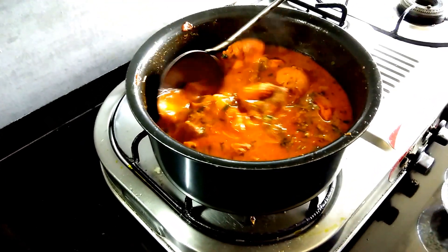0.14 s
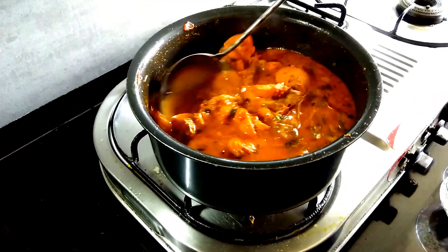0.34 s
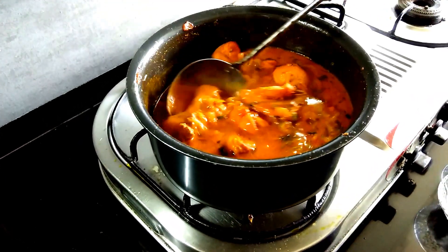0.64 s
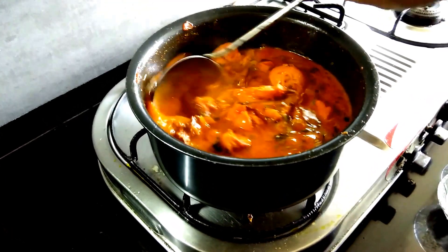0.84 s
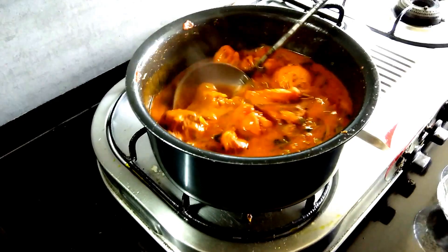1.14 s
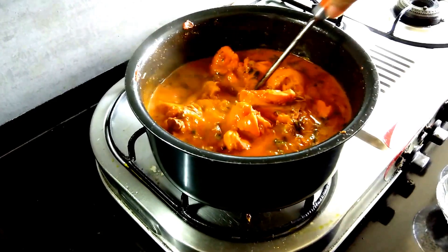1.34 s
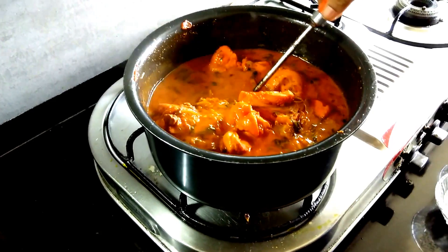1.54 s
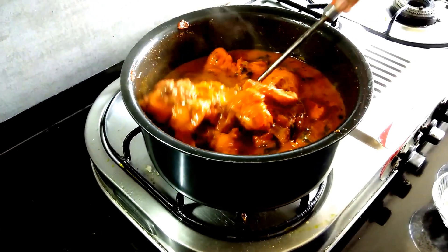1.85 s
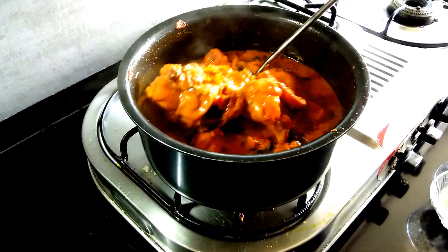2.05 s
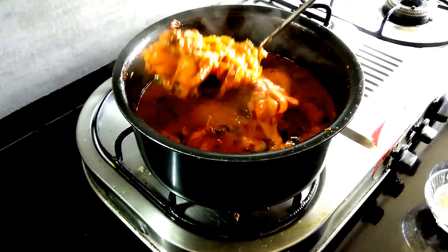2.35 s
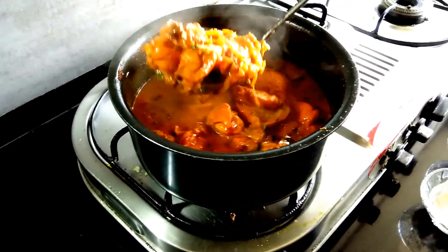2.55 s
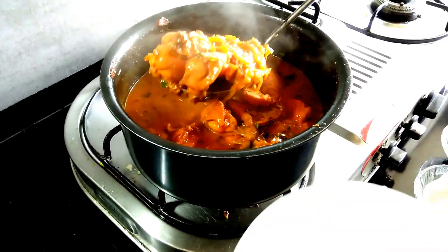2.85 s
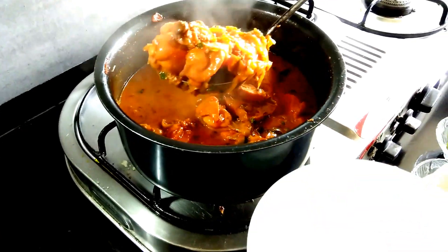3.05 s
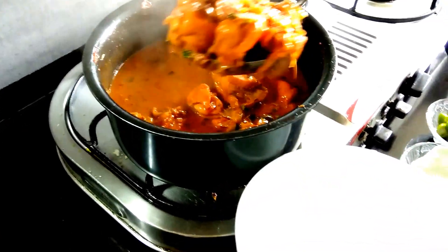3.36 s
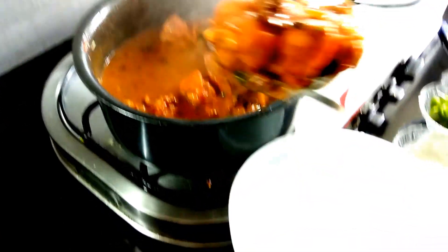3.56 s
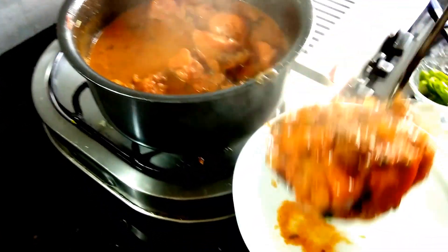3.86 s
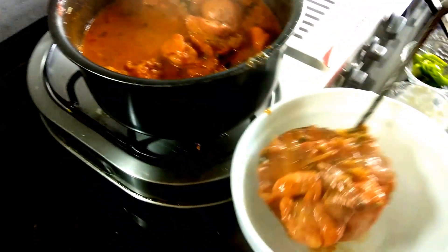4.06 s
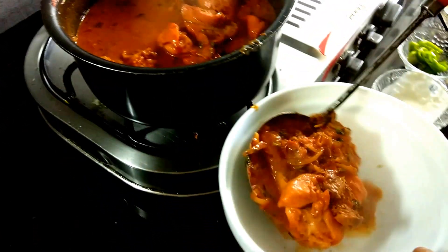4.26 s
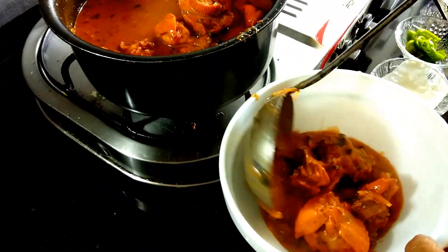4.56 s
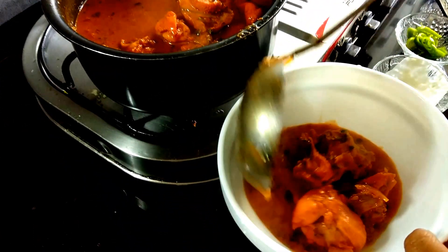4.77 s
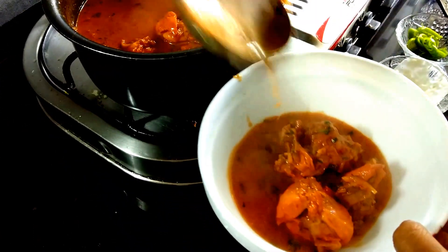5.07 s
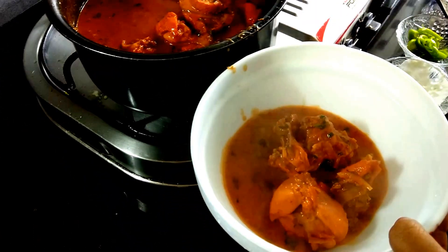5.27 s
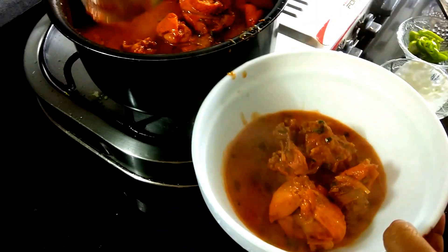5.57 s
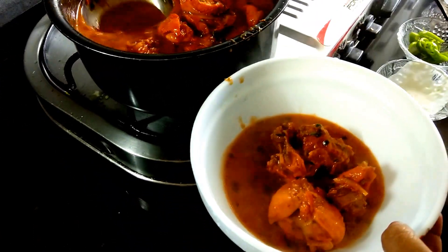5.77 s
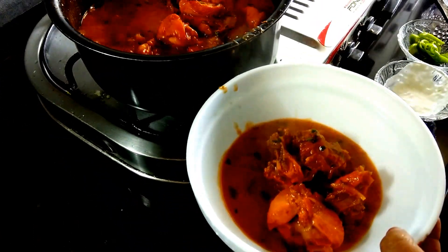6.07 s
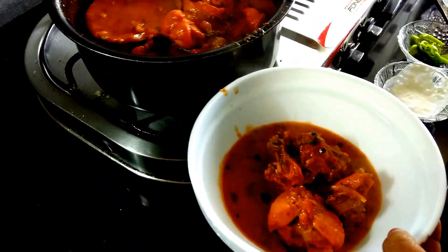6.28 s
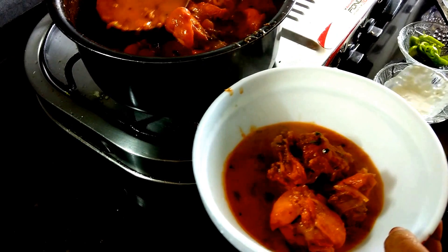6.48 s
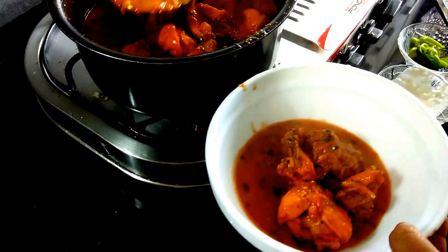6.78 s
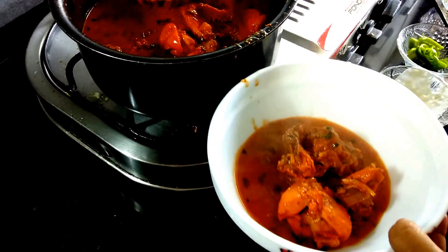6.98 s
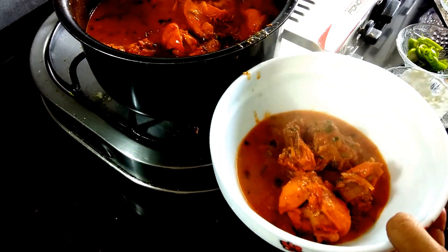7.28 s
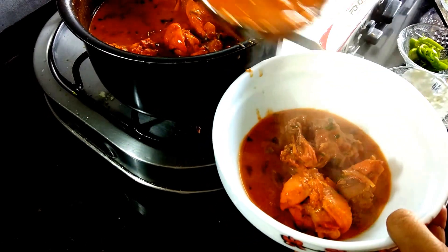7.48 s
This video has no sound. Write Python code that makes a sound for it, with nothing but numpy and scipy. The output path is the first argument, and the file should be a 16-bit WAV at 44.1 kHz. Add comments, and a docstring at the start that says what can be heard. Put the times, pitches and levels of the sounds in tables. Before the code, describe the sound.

Light knocks and taps, a steel pot's clank and one loud pop as curry is ladled into a bowl over steady kitchen air.

```python
"""A small kitchen with hard walls, where curry is ladled from a pot into a bowl near a hand-held camera.
The loudest sound is a pop: an air pocket bursts under a lump of food. The steel pot clanks, the ladle
clinks, gravy drips, and knocks, worktop taps and wet ticks echo in the room. A sliding dish rubs and
rings, and fingers thump the camera. Behind it all are a steady murmur of air, two short hums and a
faint wavering whistle and hiss. The camera's two microphones hear it as left and right."""
import sys
import numpy as np
from scipy import signal
from scipy.fft import rfft, irfft
from scipy.io import wavfile
from scipy.ndimage import uniform_filter1d

SR = 44100
rng = np.random.default_rng(int(sys.argv[2]) if len(sys.argv) > 2 else 0)


def master_out(mix):
    """Clip the mix to full scale and print it as 16-bit PCM to the path in sys.argv[1]."""
    frames = np.transpose(np.atleast_2d(mix))
    ceiling = np.clip(frames, -1, 1)
    pcm = np.round(ceiling * 32767).astype(np.int16)
    wavfile.write(sys.argv[1], SR, pcm)


N = 336659

# How long the room's echo takes to fade by 60 dB: (frequency [Hz], fade time [s])
ROOM_FADE = [(300, 0.23), (2000, .2), (15000, 0.25)]
# How alike the two microphones sound: (frequency [Hz], likeness [0 to 1])
LIKENESS = [(150, .9), (550, 0.81), (1600, .3), (5000, .1)]
# Tone of the air, from bass to treble: (frequency [Hz], level [dB])
AIR_TONE = [(30, -16.5), (62, 1.5), (110, -2), (155, -9.5), (312, -1.5), (521, -6.5), (612, -10),
            (1020, -10.5), (1300, -12.5), (1800, -18.5), (2690, -22), (3300, -30), (5000, -33),
            (8000, -34.5), (12500, -38)]
# Pan is how much louder the left is than the right. For the air: (frequency [Hz], pan [dB])
AIR_PAN = [(60, -4.5), (180, -2), (550, 0.5), (1650, 5.5), (4970, 0.5), (15000, 2.0)]
# Low hums: (time [s], length [s], level [dB])
HUMS = [(.105, .065, -49), (.17, .11, -50)]
# A whistle and a soft hiss above it: (start [s], end [s], level [dB])
WHISTLE, HISS = (2.84, 6.62, -85), (2.86, 4.2, -86)
# Their bands of noise: (frequency [Hz], width [Hz], level [dB])
WHISTLE_BANDS = [(3748, 77, 0)]
HISS_BANDS = [(4600, 600, 0)]
# Fingers on the camera: (time [s], level on the right [dB], pitch [Hz], length [s], pan [dB], snap [dB])
THUMPS = [(.001, -37.5, 85, 0.017, -6, -30), (0.029, -39, 94, 0.03, -6, -30),
          (.066, -35, 70, .012, -4, -30), (3.574, -22.5, 62.5, .028, -24, -3.5),
          (3.819, -47, 55, 0.027, -18, -20), (4.965, -49, 65, .03, -9, -19),
          (5.161, -48, 60, 0.037, -11, -15), (5.6, -44, 55, 0.055, -19, -6),
          (7.058, -32, 57, 0.043, -28, -12), (7.394, -35.5, 60, 0.047, -25, 8.5)]
# Hollow knocks: (time [s], level [dB], treble tilt [dB per octave], pan [dB])
KNOCKS = [(0.015, -34.5, 1, 4.0), (0.516, -42, -0.5, 3.5), (0.999, -41.5, -0.5, 2.0),
          (5.858, -45.5, -5, 5.5), (7.035, -52, 1.5, 7.5), (7.185, -58, 0, 7.0)]
# Tone of a knock: (frequency [Hz], level [dB])
KNOCK_TONE = [(240, -51), (445, -24), (650, -3), (856, -9.5), (1140, 3), (1330, -12), (1790, -7),
              (2520, -29), (5000, -41), (6500, -69)]
# Worktop taps: (time [s], level [dB], treble [dB], low knock [dB], highest treble [dB], rim ring [dB])
TAPS = [(0.257, -35.5, -2, -1.5, -6, 3), (0.649, -41, -4, -12, -36, 1), (0.948, -63, -12, 21, 4, 0),
        (1.172, -36.5, 2, -2, -8, 0), (1.611, -46, -5, 1, -30, 0), (3.671, -40.5, -4, -3, -22, 6),
        (6.221, -39, 2.5, -.5, -6, 1), (7.6015, -41, -2, -20, -36, 16), (7.611, -35, 7, -20, -10, 13)]
# Tone of a tap's crack: (frequency [Hz], level [dB])
TAP_TONE = [(290, -36), (500, -9), (831, -18.5), (1200, -1.5), (1650, -6.5), (2010, -1), (4090, -19),
            (5900, -11.5), (11500, -21), (14900, -22), (16000, -32)]
# Modes are the notes a struck thing rings at. The worktop's: (pitch [Hz], level [dB], fade time [s])
WORKTOP_MODES = [(245, -2, .11), (300, 1.5, .14)]
# Thin wet ticks: (time [s], level [dB], frequency [Hz], pan [dB], length [s])
TICKS = [(0.319, -54, 9000, 5, .001), (2.364, -64, 5500, 4, .004), (2.586, -61, 8000, 7, .005),
         (2.596, -56, 15000, 7, .006), (3.945, -63, 4300, 3, .005), (4.4288, -55, 12000, 9.5, .001),
         (4.549, -60, 5700, 6, .011), (4.737, -59.5, 13500, 4.5, .002), (6.819, -59.5, 9000, 4, .009),
         (6.863, -62.5, 15000, 4, .003)]
# How firmly the sliding dish is pushed: (time [s], level [dB])
SLIDE_PUSH = [(4.86, -75), (4.89, -64), (4.966, -57), (5.014, -62), (5.07, -52), (5.092, -57), (5.12, -50),
              (5.16, -56), (5.215, -58), (5.26, -74)]
# Where the dish rings: (frequency [Hz], rough width [Hz], level [dB])
DISH_BANDS = [(900, 70, -9), (1049, 58, 0), (1200, 80, -9.5), (1570, 230, -18), (2080, 98, -15.5),
              (2390, 300, -15.5)]
# Blows on the steel pot: (time [s], level [dB])
CLANKS = [(3.5295, -21)]
# The pot's notes: (pitch [Hz], level [dB], fade time [s])
POT_MODES = [(388, -12, .1), (753, -13, .12), (838, -9, .15), (980, -5, .13), (1142, 7, .12),
             (1943, -9, .17), (2270, -9, .12), (2729, -13, .14), (3327, -15, .14), (4050, -18, .14),
             (5050, -20, .14), (5346, -19, .12), (9572, -16, .09), (10060, -11, .1), (10450, -12, .07)]
# Tone of its rattling wall: (frequency [Hz], level [dB])
RATTLE_TONE = [(300, -27), (624, -24), (1140, -6), (1610, -28), (1930, -13), (3520, -20), (4520, -33),
               (5500, -24), (8000, -30), (9900, -21.5), (14700, -33.5), (16000, -54)]
# Gravy drips: (time [s], level [dB], pitch [Hz], length [s])
DRIPS = [(2.263, -49.5, 780, .007), (2.876, -52.5, 600, .005), (4.4258, -44, 1000, .001)]
# The ladle touches the bowl: (time [s], level [dB], favoured pitch [Hz])
CLINKS = [(4.2775, -38, 3800), (4.2775, -47, 10500), (4.429, -51, 9000), (4.429, -56, 2200),
          (4.5035, -46.5, 2400), (4.5465, -51, 2800)]
# The ladle's notes: (pitch [Hz], level [dB], fade time [s])
LADLE_MODES = [(2720, 0, .012), (3600, -9, .03), (5170, -10, .025), (6800, -3, .025), (8330, 0, .025),
               (9550, 0, .045)]
# Tone of food landing: (frequency [Hz], level [dB])
SPLAT_TONE = [(300, -20), (1500, -4), (2800, -17), (3600, -8), (6000, -18.5), (10500, -15.5), (16000, -26)]
# The bowl's notes: (pitch [Hz], level [dB], fade time [s])
BOWL_MODES = [(415, -6, 0.091), (651, -9, .1), (797, 0, .12), (942, -3, .12), (1017, -5, .12),
              (1249, -4, .1)]
# Near walls throw the pop back: (delay [s], level [dB])
POP_ECHOES = [(.0095, -20), (.0265, -21), (.0335, -22)]

RIGHT_LAG_SAMPLES = 12  # sound reaches the left microphone first
STOVE_PAN_DB = 4.5  # pot and worktop lie a little to the left


def gain_of(db):
    """Turns decibels into a number to multiply by."""
    return 10 ** (np.asarray(db) / 20)


def evened(x):
    """Scales a sound to an average strength (rms) of 1."""
    return x / np.sqrt(np.mean(x ** 2) + 1e-20)


def peaked(x):
    """Scales a sound to a peak of 1."""
    return x / (abs(x).max() + 1e-20)


def levelled(hit):
    """Scales a noisy hit to peaks near 1, going by its first 30 ms."""
    return hit / (4 * np.sqrt(np.mean(hit.mean(0)[:1300] ** 2)))


def read(table, hz):
    """Looks up a frequency in a table, gliding between the rows."""
    row_hz, value = np.transpose(table)
    return np.interp(np.log(hz + 1), np.log(row_hz + 1), value)


def octaves(hz, centre_hz):
    """How many octaves hz lies above the centre."""
    return np.log2(hz / centre_hz + 1e-3)


def add(mix, start, sound, pan_db=0):
    """Mixes a sound in at start seconds, leaning left or right."""
    part = mix[:, round(start * SR):][:, :sound.shape[-1]]
    part += (sound * gain_of([[pan_db / 2], [-pan_db / 2]]))[:, :part.shape[1]]


def resonate(x, hz, width):
    """Keeps a narrow band around hz: shift it down, smooth it, shift it back."""
    turn = np.exp(2j * np.pi * np.cumsum(hz * np.ones(x.shape[-1])) / SR)
    memory = np.exp(-np.pi * width / SR)
    return 2 * (turn * signal.lfilter([1 - memory], [1, -memory], x / turn)).real


def narrowed(noise, hz, width):
    """Resonates noise twice, so it takes on a fuzzy pitch."""
    return evened(resonate(resonate(noise, hz, width), hz, width))


def coloured(x, db_of):
    """Changes a sound's tone by db_of(hz) decibels, with no ringing before it starts."""
    hz = abs(np.fft.fftfreq(4096, 1 / SR))
    log_gain = np.log(gain_of(np.maximum(db_of(hz), -100)))
    kernel = np.fft.ifft(np.exp(np.conj(signal.hilbert(log_gain)))).real[:2048]
    return signal.fftconvolve(x, kernel)


def brighter(treble_db, corner_hz):
    """A tone curve that lifts or lowers everything above the corner."""
    return lambda hz: treble_db * np.clip(octaves(hz, corner_hz), 0, 1)


def wander(length, size):
    """A slow random wobble, smooth over size samples."""
    smooth = uniform_filter1d(rng.standard_normal(N), size)
    return evened(uniform_filter1d(smooth, size))[:length]


def ring(modes, rise=.0005):
    """Fading notes of a thing struck at a new spot each time; a soft blow lets them swell."""
    t = np.arange(SR // 3) / SR
    spot_db = 1.5 * rng.standard_normal(len(modes))
    notes = sum(gain_of(db + extra_db) * 1000 ** (-t / fade) * np.sin(2 * np.pi * hz * t)
                for (hz, db, fade), extra_db in zip(modes, spot_db))
    return (1 - np.exp(-t / rise)) * notes


def contact(length):
    """Two things meet: a short grainy push that favours no pitch."""
    t = np.arange(1024) / SR
    spectrum = rfft(rng.standard_normal(len(t)) * np.exp(-t / length) * (1 - np.exp(-t / .0012)))
    return irfft(spectrum / abs(spectrum), len(t)) * np.exp(-t / (3 * length))


def paired(spectra, hz):
    """The two microphones hear similar bass but different treble, the right one a little later."""
    left, other = spectra
    same = read(LIKENESS, hz)[:, None]
    later = np.exp(-2j * np.pi * hz * RIGHT_LAG_SAMPLES / SR)[:, None]
    return np.array([left, same * later * left + np.sqrt(1 - same ** 2) * other])


def kitchen(x, echo_db, lag=RIGHT_LAG_SAMPLES):
    """The sound arrives directly, then as many fading echoes from the walls."""
    echoes = np.zeros((2, 16000))
    arrivals = np.arange(60, 15980, 20) + rng.integers(0, 20, (2, 796))
    np.put_along_axis(echoes, arrivals, rng.choice([-1., 1.], arrivals.shape), 1)
    hz, t, spectra = signal.stft(echoes, SR, nperseg=256)
    spectra = paired(spectra, hz) * 1000 ** (-t / read(ROOM_FADE, hz)[:, None])
    room = signal.istft(spectra, SR, nperseg=256)[1]
    room = gain_of(echo_db) * room / np.linalg.norm(room[0])
    room[[0, 1], [0, lag]] += 1  # the direct sound
    return signal.fftconvolve(x[None], room, axes=1)


def air(db=-60, top_hz=12700):
    """The room's murmur: noise with drifting louder and softer patches, lumpier in the bass."""
    frames, hz = N // 512 + 5, np.fft.rfftfreq(2048, 1 / SR)
    a, b, c, d, patches = rng.standard_normal((frames, len(hz), 5)).T
    noise = paired(np.array([a + 1j * b, c + 1j * d]), hz)
    patches = evened(uniform_filter1d(uniform_filter1d(patches, 14, axis=0), 6, axis=1))
    hz = hz[:, None]
    patch_db = (1 + 2 / (1 + (hz / 500) ** 2)) * patches
    side_db = np.array([.5, -.5])[:, None, None] * read(AIR_PAN, hz)
    spectra = noise * gain_of(read(AIR_TONE, hz) + patch_db + side_db) * (hz < top_hz)
    return gain_of(db) * evened(signal.istft(spectra, nperseg=2048, noverlap=1536)[1][:, :N])


def hum(start, length, db, hz=103, rise_hz_per_s=25):
    """A low tone that creeps upward."""
    t = np.arange(start, start + length, 1 / SR)
    tone = np.sqrt(2) * np.sin(2 * np.pi * (hz + rise_hz_per_s * t / 2) * t)
    return start, gain_of(db) * tone * signal.windows.tukey(len(t), .6)


def whistle(start, end, db, bands):
    """Noise that flutters and drifts in level: a narrow band whistles, a wider one hisses."""
    t = np.arange(start, end, 1 / SR)
    fade = np.clip(np.minimum(t - start, end - t) / .1, 0, 1)
    noise = rng.standard_normal((2, N))[:, :len(t)]
    waver_db = 2.4 * wander(len(t), size=1500) + 1.2 * wander(len(t), size=9000)
    tone = sum(gain_of(band_db) * narrowed(noise, hz, width) for hz, width, band_db in bands)
    return start, fade * gain_of(db + waver_db) * tone


def thump(hz, length, snap_db):
    """The camera body swings a few times; a quick finger adds a short, higher snap."""
    t = np.arange(SR // 4) / SR
    turns = hz * (t + .0038 * (1 - np.exp(-t / .0084)))  # the pitch starts high and settles
    swing = np.sin(2 * np.pi * turns) * np.exp(-(t / length) ** 2.4) * (1 - np.exp(-t / .0016))
    snap = np.sin(2 * np.pi * 230 * t) * np.exp(-((t - .004) / .003) ** 2)
    return gain_of(snap_db) * snap - swing


def knock(tilt_db):
    """A soft blow on something hollow: short, with little treble."""
    blow = coloured(contact(.0067), lambda hz: read(KNOCK_TONE, hz) + tilt_db * octaves(hz, 1000))
    return levelled(kitchen(blow, echo_db=6.5))


def tap(treble_db, knock_db, top_db, rim_db, rim_hz=2280):
    """A crack with a rim's short ring, and the worktop's low knock under it."""
    treble, top = brighter(treble_db, 2600), brighter(top_db, 8500)
    rim = lambda hz: rim_db * np.exp(-(octaves(hz, rim_hz) / .13) ** 2)
    crack = coloured(contact(.003), lambda hz: read(TAP_TONE, hz) + treble(hz) + top(hz) + rim(hz))
    crack = levelled(kitchen(crack, echo_db=8))
    sound = gain_of(knock_db) * levelled(kitchen(ring(WORKTOP_MODES, rise=.006), echo_db=-6.5))
    add(sound, 0, crack)
    return sound


def tick(centre_hz, length):
    """A tiny wet touch: a puff of treble noise."""
    t = np.arange(2048) / SR
    puff = rng.standard_normal(len(t)) * t * np.exp(-t / length)
    puff = coloured(puff, lambda hz: -17 * octaves(hz, centre_hz) ** 2)
    return levelled(kitchen(puff, echo_db=-3.5))


def slide(settle_s=.06):
    """Uneven rubbing makes a sliding dish ring."""
    times, levels = np.transpose(SLIDE_PUSH)
    t = np.arange(times[0], times[-1], 1 / SR)
    bend = 1 - .05 * np.exp(-(t - t[0]) / settle_s)  # the ring starts low and settles
    rub = rng.standard_normal((2, SR))[:, :len(t)]
    rub[1] = .6 * rub[0] + .83 * rub[1]  # left and right are partly alike
    dish = sum(gain_of(db) * narrowed(rub, hz * bend, width * 1.7) for hz, width, db in DISH_BANDS)
    return t[0], gain_of(np.interp(t, times, levels)) * evened(dish)


def clank():
    """The steel pot rings and its thin wall rattles; the left side hears more treble."""
    # The pot is not quite round, so each note throbs against a close twin.
    splits = .006 * rng.uniform(-1, 1, len(POT_MODES))
    twins = [(hz * (1 + split), db - 10.5, fade) for (hz, db, fade), split in zip(POT_MODES, splits)]
    pot = levelled(kitchen(ring(POT_MODES + twins, rise=.009), echo_db=-1.5))
    rattle = coloured(contact(.0027), lambda hz: read(RATTLE_TONE, hz))
    add(pot, 0, gain_of(-1.5) * levelled(kitchen(rattle, echo_db=6)))
    left, right = coloured(pot[0], brighter(3, 4500)), coloured(pot[1], brighter(-3, 4500))
    return levelled(np.array([left, right]))


def drip(hz, length):
    """A small bubble in the gravy quivers a few times."""
    t = np.arange(SR // 20) / SR
    bubble = np.sin(2 * np.pi * hz * t) * t * np.exp(-(t / length) ** 2)
    return kitchen(peaked(bubble), echo_db=-6)


def clink(centre_hz):
    """The ladle clicks on the bowl and rings, most near the pitch that the touch favours."""
    modes = [(hz, db - 50 * np.log2(hz / centre_hz) ** 2, fade) for hz, db, fade in LADLE_MODES]
    ladle = peaked(ring(modes))
    click = peaked(coloured(contact(.0012), lambda hz: -6 * octaves(hz, centre_hz) ** 2))
    ladle[:len(click)] += gain_of(1.5) * click
    return peaked(kitchen(ladle, echo_db=-5.5))


def splat():
    """Wet food meets the bowl just before the pop."""
    food = coloured(contact(.0043), lambda hz: read(SPLAT_TONE, hz))
    return levelled(kitchen(food, echo_db=3))


def pop(start_hz=890, end_hz=710, rise_s=.0005, length_s=.0037):
    """An air pocket bursts under the food: a falling blip, a wet slap, then the ringing bowl."""
    t = np.arange(SR // 3) / SR
    turns = np.cumsum(end_hz + (start_hz - end_hz) * np.exp(-(t / .004) ** 2)) / SR
    shape = (1 - np.exp(-(t / rise_s) ** 2)) * np.exp(-(t / length_s) ** 2)
    slap = gain_of(-15) * np.sin(2 * np.pi * 1700 * t) + gain_of(-21) * np.sin(2 * np.pi * 450 * t)
    burst = np.cos(2 * np.pi * turns) * shape - slap * shape ** 2
    bass_loss = lambda hz: 7 * np.log2(np.clip(hz / 450, .01, 1))  # too small to push bass
    burst = peaked(coloured(burst, bass_loss)[:len(t)])
    echoes = sum(gain_of(db) * np.roll(burst, round(delay * SR)) for delay, db in POP_ECHOES)
    bowl = gain_of(-28) * peaked(ring(BOWL_MODES, rise=.006))
    return kitchen(burst + echoes + bowl, echo_db=-8.5, lag=4)  # nearly straight ahead


def scene():
    """Lays every sound over the air, as the two microphones hear it."""
    mix = air()
    for time, db in CLANKS:
        add(mix, time, gain_of(db) * clank(), STOVE_PAN_DB)
    for time, db, tilt_db, pan_db in KNOCKS:
        add(mix, time, gain_of(db) * knock(tilt_db), pan_db)
    for time, db, *tone_db in TAPS:
        add(mix, time, gain_of(db) * tap(*tone_db), STOVE_PAN_DB)
    for time, db, hz in CLINKS:
        add(mix, time, gain_of(db) * clink(hz), pan_db=6)
    for time, db, hz, length in DRIPS:
        add(mix, time, gain_of(db) * drip(hz, length))
    for time, db, hz, pan_db, length in TICKS:
        add(mix, time, gain_of(db) * tick(hz, length), pan_db)
    for time, db, hz, length, pan_db, snap_db in THUMPS:
        add(mix, time, gain_of(db + pan_db / 2) * thump(hz, length, snap_db), pan_db)
    add(mix, 4.2768, gain_of(-38) * splat(), pan_db=4)
    add(mix, 4.2799, gain_of(-7.5) * pop())
    add(mix, *slide(), pan_db=4.5)
    add(mix, *whistle(*WHISTLE, WHISTLE_BANDS), pan_db=1)
    add(mix, *whistle(*HISS, HISS_BANDS))
    for row in HUMS:
        add(mix, *hum(*row), pan_db=-4)
    return mix


def record(dry, low_hz=44.9, high_hz=16100):
    """The small microphones lose the deep bass; the very highest treble is cut too."""
    thin = signal.sosfilt(signal.butter(2, low_hz, "high", fs=SR, output="sos"), dry)
    treble_cut = signal.firwin(511, high_hz, window=("kaiser", 9), fs=SR)
    return signal.oaconvolve(thin, treble_cut[None], "same")


dry = scene()
out = record(dry)
master_out(out)
```